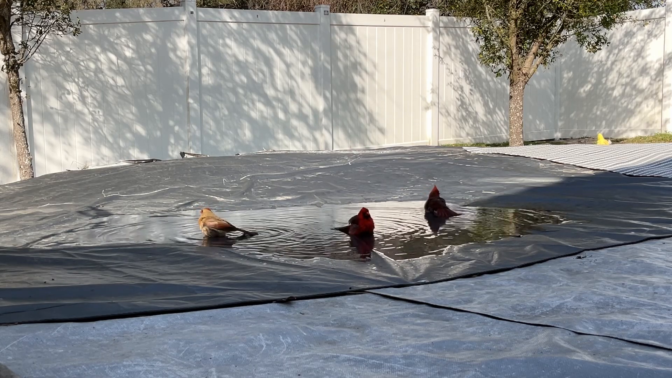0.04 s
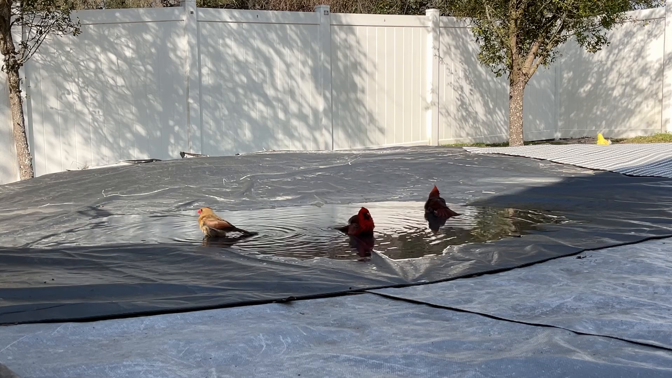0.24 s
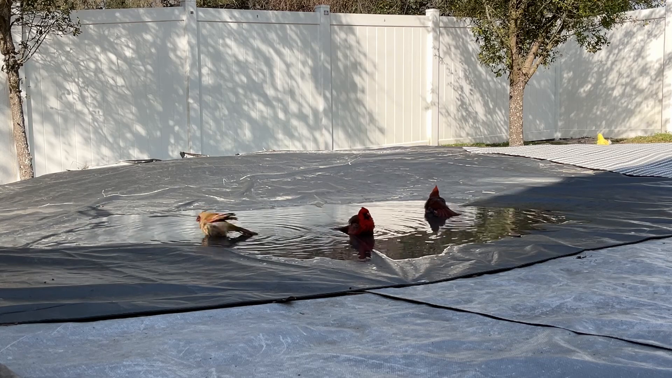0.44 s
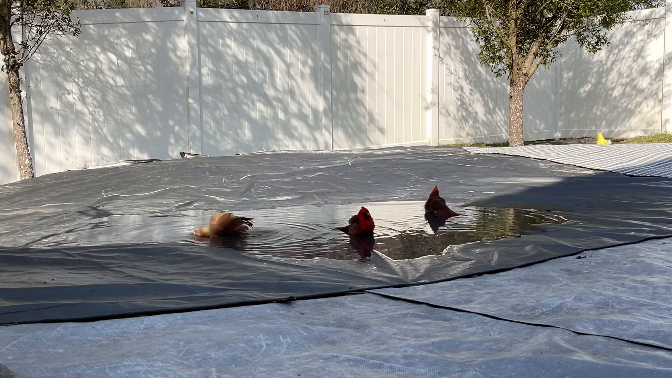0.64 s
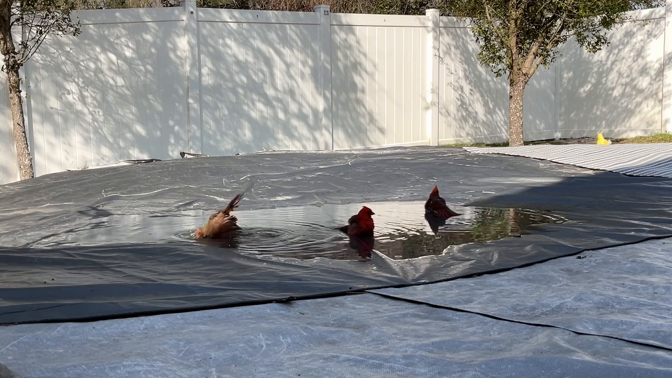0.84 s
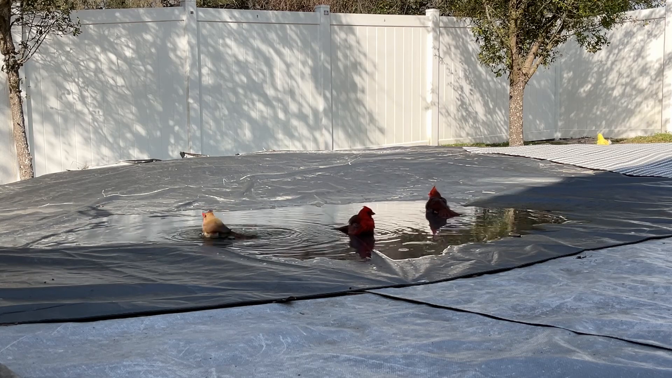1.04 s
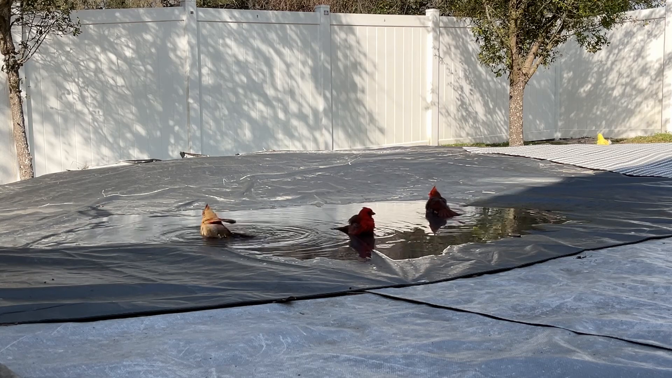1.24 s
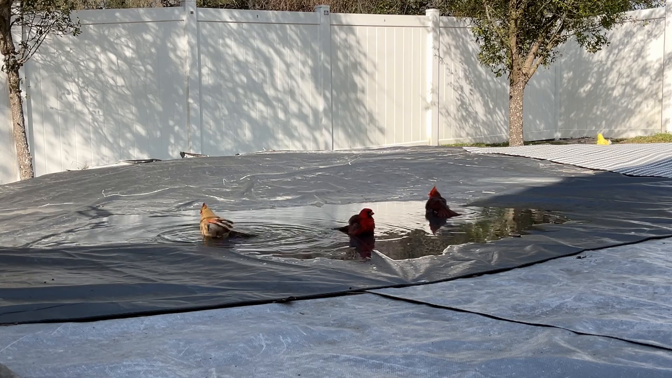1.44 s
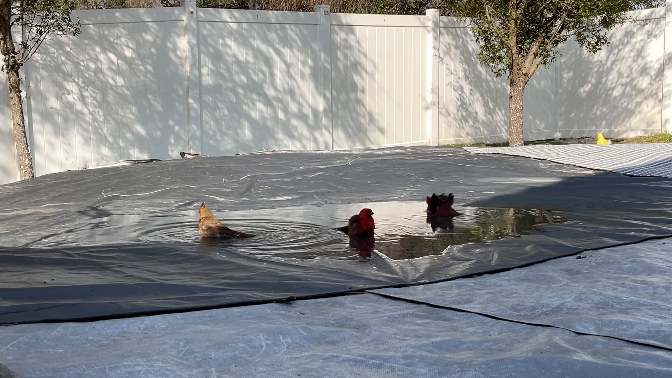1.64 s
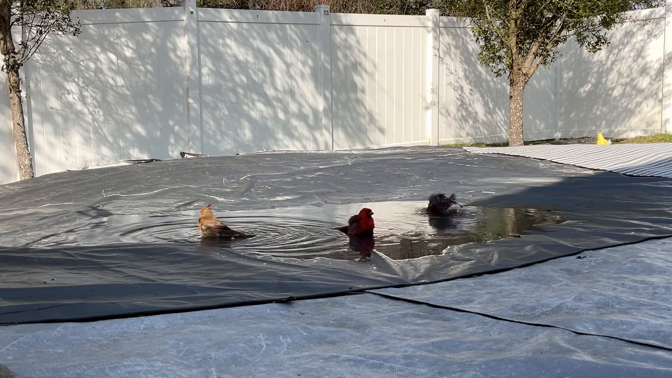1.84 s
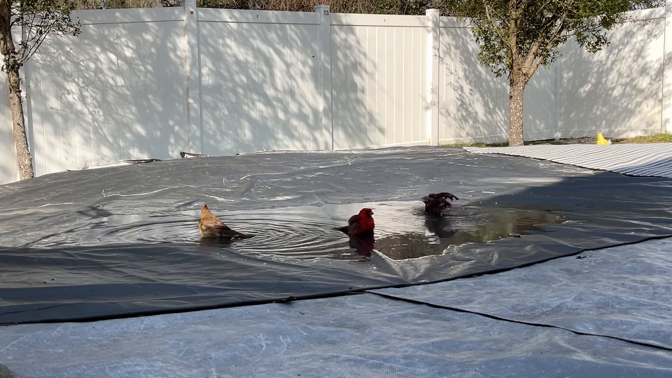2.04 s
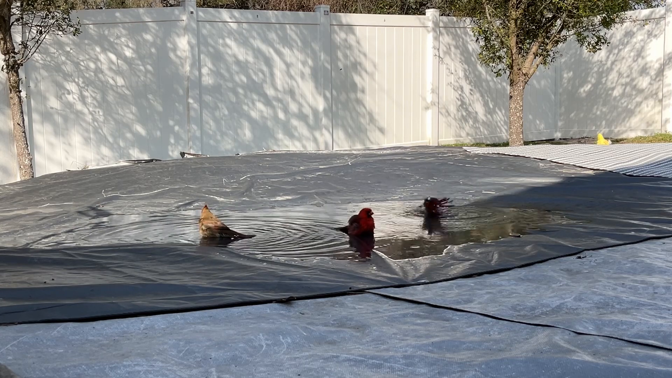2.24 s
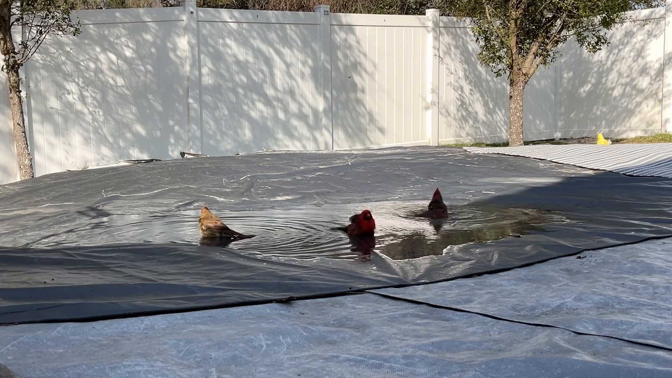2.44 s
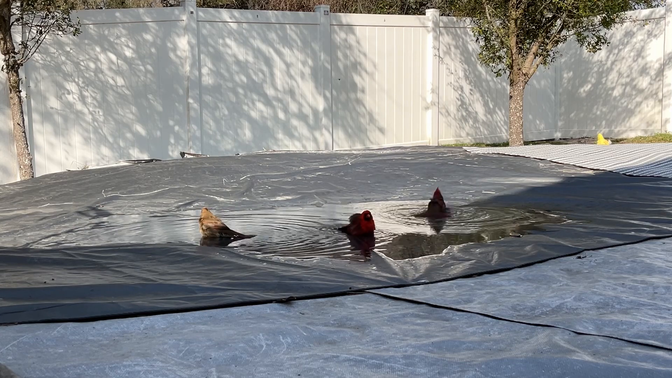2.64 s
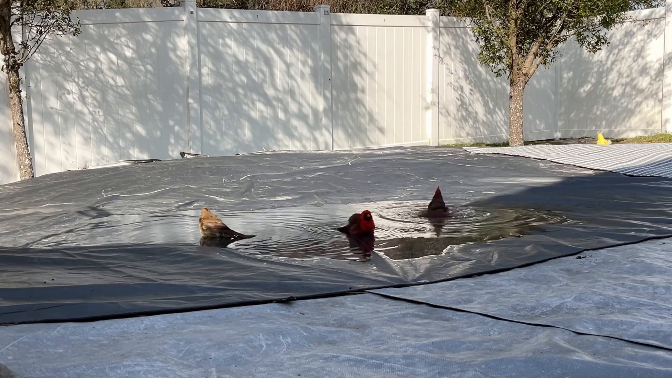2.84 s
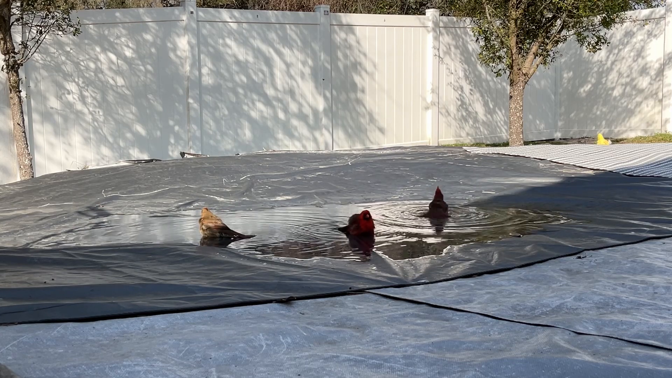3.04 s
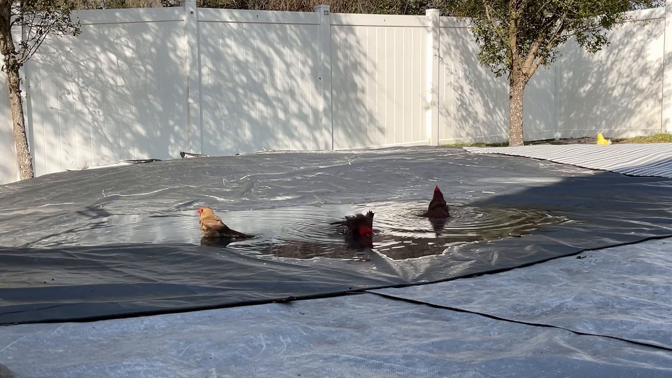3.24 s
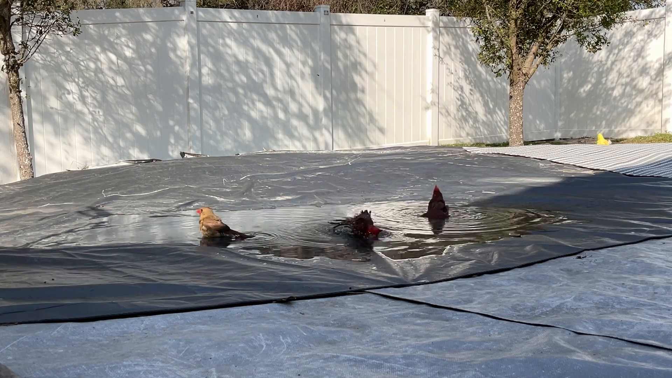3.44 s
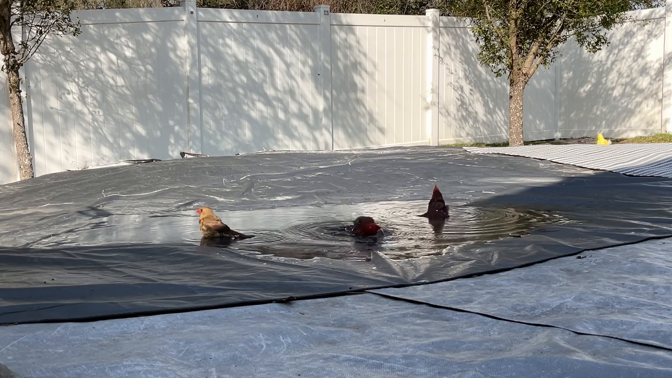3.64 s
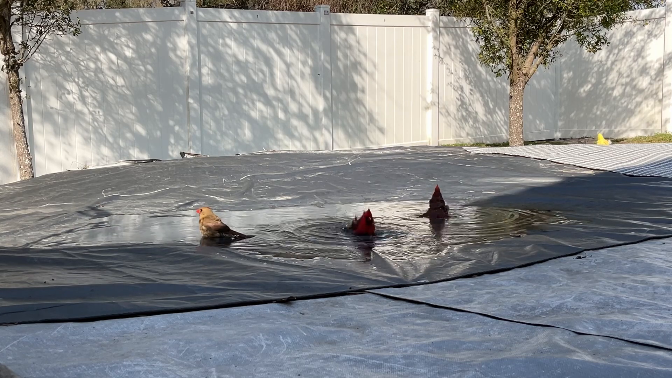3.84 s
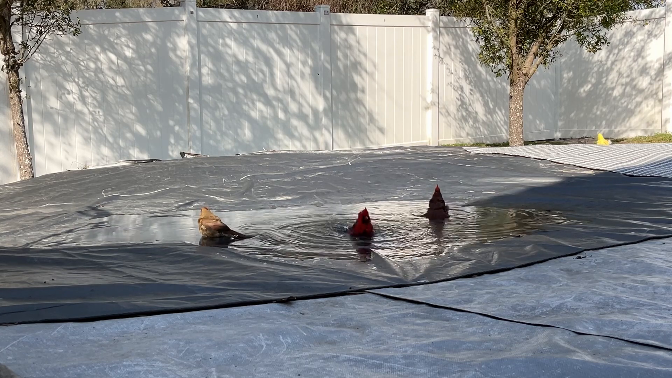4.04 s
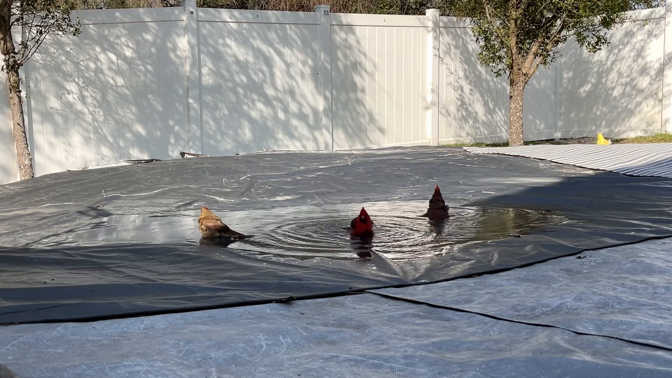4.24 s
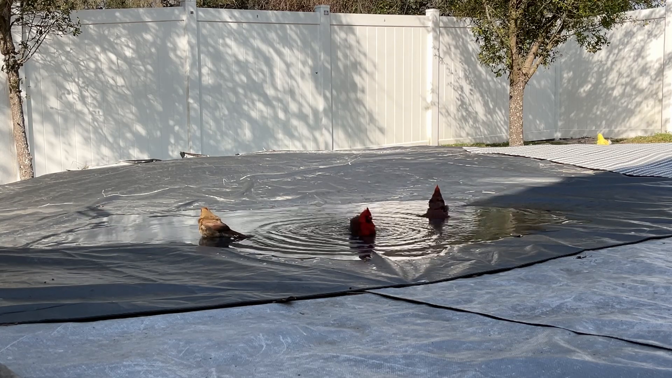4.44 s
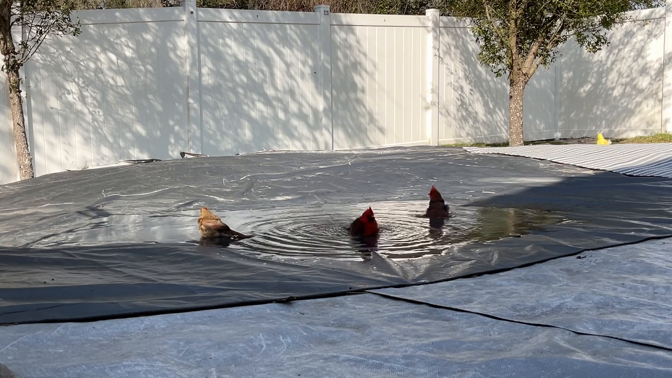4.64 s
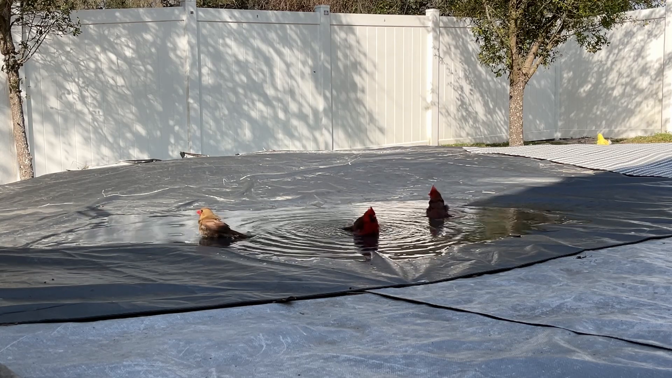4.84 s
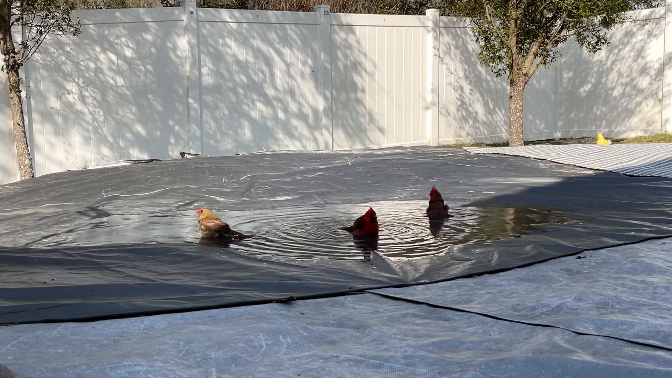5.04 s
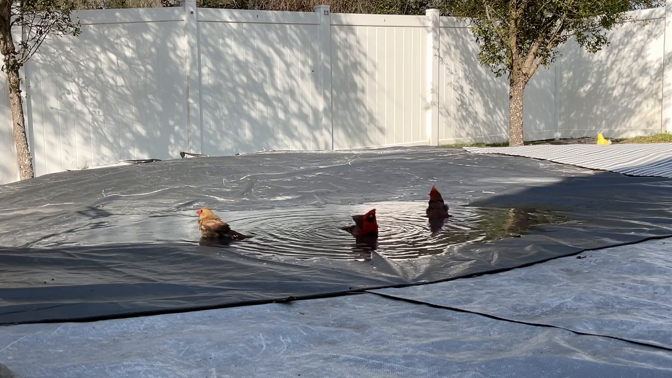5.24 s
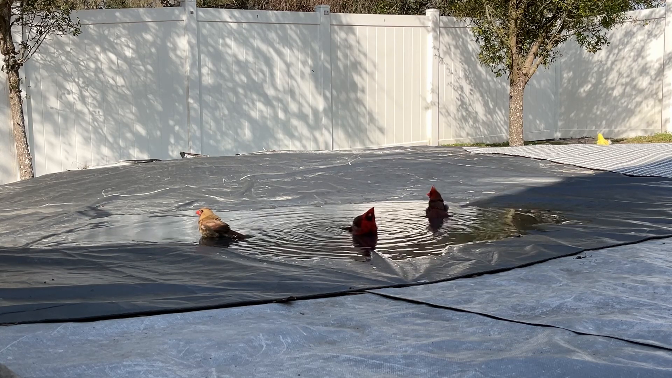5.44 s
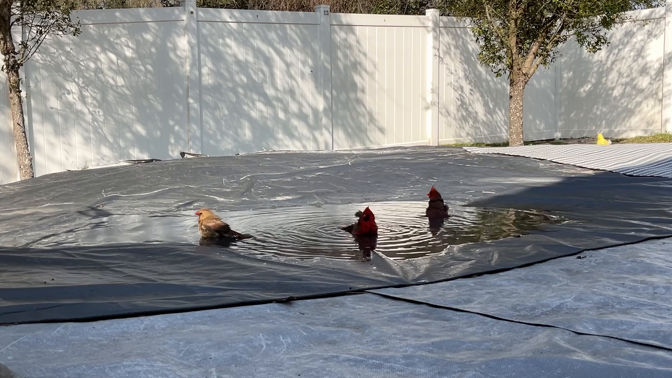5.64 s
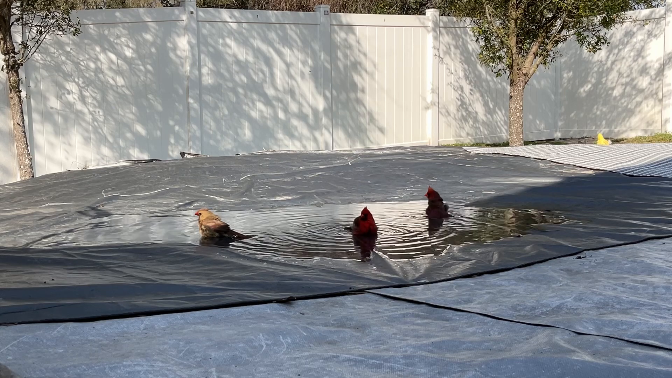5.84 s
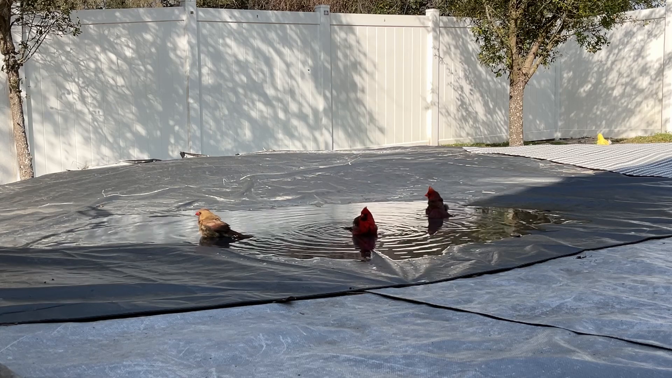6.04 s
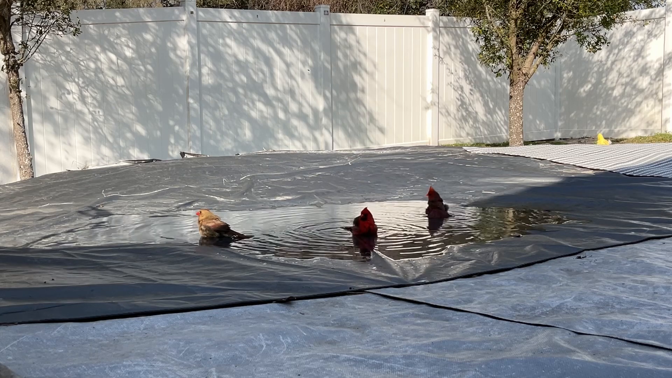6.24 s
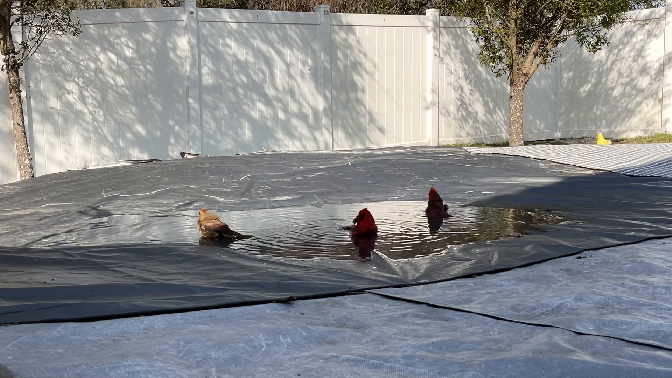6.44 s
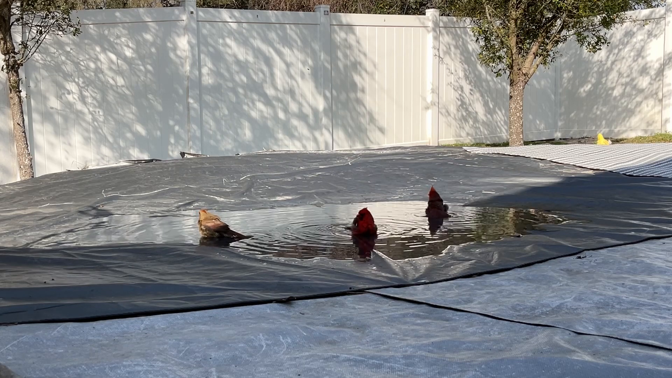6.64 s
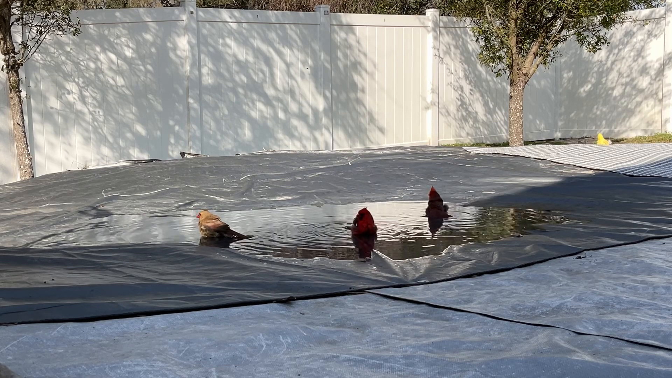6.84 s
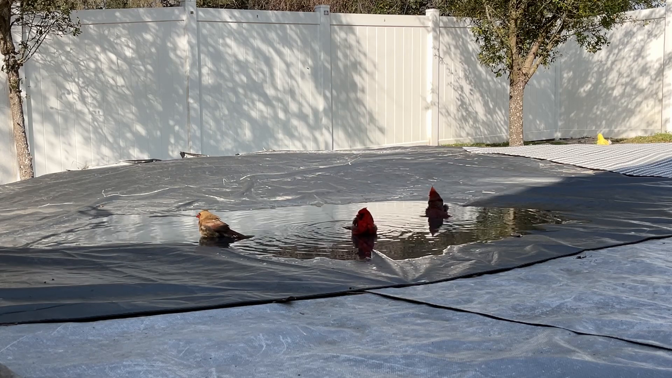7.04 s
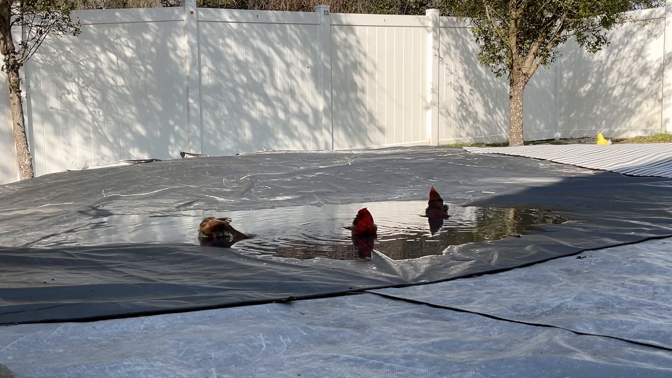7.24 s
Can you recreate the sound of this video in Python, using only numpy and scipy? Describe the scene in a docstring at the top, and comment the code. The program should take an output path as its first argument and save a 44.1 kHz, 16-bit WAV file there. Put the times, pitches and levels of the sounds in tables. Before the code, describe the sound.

Songbirds bathe in a shallow puddle on a plastic cover in a garden. Quick bouts of wing beats slap and splash, with small plops, bubbles and pattering drops, until just before five seconds. Faint whistles and thin chirps echo around; later distant crows, buzzy tweets and rising sweeps stand out. Low traffic rumble runs throughout, one engine fading away and another pulling up. Stereo microphone fairly close to the bath.

```python
"""Songbirds bathe in a puddle on a pool cover: bouts of wing beats slap the water and throw up spray.
Splashes are coloured trains of tiny drop impacts; trapped bubbles and air pockets ring as sines.
Other birds whistle and chirp in the echoing gardens around, crows call far off: gliding, buzzing tones.
Distant traffic rumbles as shaped noise; one engine cruises away, another pulls up through its gear."""
import sys
import numpy as np
from scipy import signal
from scipy.fft import rfft, irfft, next_fast_len
from scipy.io import wavfile
from scipy.ndimage import uniform_filter1d, map_coordinates

SR = 44100
rng = np.random.default_rng(int(sys.argv[2]) if len(sys.argv) > 2 else 0)


def output_pcm(signal):
    """Save a mono or channel-first signal as 16-bit PCM at the path in sys.argv[1].

    Samples are clipped to [-1, 1] before scaling.
    """
    pcm = np.clip(np.atleast_2d(signal).T, -1, 1) * 32767
    wavfile.write(sys.argv[1], SR, np.round(pcm).astype(np.int16))


N = 322371  # samples


def amp(db):
    """Decibels to gain."""
    return 10 ** (np.asarray(db) / 20)


def unit(x):
    """x at rms 1."""
    return x / np.sqrt(np.mean(x ** 2) + 1e-20)


def along(points, hz):
    """(hz, value) points read on a log frequency axis."""
    f, v = np.transpose(points)
    return np.interp(np.log(hz + 1), np.log(f), v)


def curves(rows):
    """One value per sample for each column after the time."""
    s, *cols = np.transpose(rows)
    return [np.interp(np.arange(N) / SR, s, c) for c in cols]


def wobble(rate):
    """A smooth random curve, rate knots a second."""
    knots = rng.standard_normal(int(N * rate / SR) + 4)
    return map_coordinates(knots, [np.arange(N) * rate / SR])


def filtered(x, response):
    """x times a response of frequency."""
    m = next_fast_len(N + SR // 2)
    return irfft(rfft(x, m) * response(np.fft.rfftfreq(m, 1 / SR)), m)[..., :N]


def coloured(x, spectrum):
    """x through a causal, minimum-phase filter of unit energy with this spectrum."""
    size = 4096
    cepstrum = irfft(np.log(amp(along(spectrum, np.fft.rfftfreq(size, 1 / SR)))))
    # keeping only positive times of the cepstrum puts the energy up front
    folded = 2 * cepstrum[:size // 2] * (np.arange(size // 2) > 0)
    kernel = irfft(np.exp(rfft(folded, size)))
    return signal.fftconvolve(x, kernel[None] / np.linalg.norm(kernel), axes=1)[:, :N]


# how alike left and right sound: hz, likeness (1 = identical)
LIKENESS = [(120, 1), (220, 0.85), (450, 0.77), (900, 0.71), (1300, 0.45), (1900, 0.17), (2500, 0.85),
            (3200, 1), (15000, 0.77)]


def stereo(pair):
    """Blends two unrelated signals into left and right, as alike as the microphone ports hear them."""
    def mid_and_side(hz):
        turn = np.arccos(np.clip(along(LIKENESS, hz), -1, 1)) / 2
        return np.array([np.cos(turn), np.sin(turn)])
    mid, side = filtered(pair, mid_and_side)
    return np.array([mid + side, mid - side])


def noise(spectrum):
    """Stereo noise of rms 1."""
    return unit(stereo(coloured(rng.standard_normal((2, N)), spectrum)))


def add(track, s, x):
    """Mix x into the track from time s."""
    part = track[max(round(s * SR), 0):][:len(x)]
    part += x[:len(part)]


def swell(t, rise, fall):
    """A quick rise and an exponential fall, top 1."""
    shape = (1 - np.exp(-t / rise)) ** 2 * np.exp(-t / fall)
    return shape / shape.max()


def sing(pitch):
    """A sine that follows a pitch curve in Hz."""
    return np.sin(2 * np.pi * np.cumsum(pitch) / SR)


# echo of the gardens: hz, t60_s
GARDEN_DECAY = [(300, 0.54), (2500, 0.75), (5000, 0.45), (9000, 0.46), (16000, 0.099)]


def garden(x):
    """Diffuse stereo echo of fences, houses and trees: noise that decays at its own rate in each band."""
    hz, t, z = signal.stft(rng.standard_normal((2, SR)), SR, nperseg=256)
    decay = amp(-60 * t / along(GARDEN_DECAY, hz)[:, None])
    tail = signal.istft(z * decay, SR, nperseg=256)[1]
    return stereo(signal.fftconvolve(x[None], tail / np.linalg.norm(tail[0]), axes=1)[:, :N])


# colour of the neighbourhood wash: hz, relative_level_db
AIR_COLOUR = [(100, -22), (220, 2.5), (350, -1.5), (650, -3), (900, -6.5), (1450, -16), (2200, -21),
              (3000, -28), (4500, -35.5), (8000, -38.5), (14000, -41), (16000, -58.5)]


def air():
    """The even wash of the neighbourhood as noise, with a faint machine hum as a sine."""
    hum = amp(-74.0 + 1.4 * wobble(2.4)) * np.sin(2 * np.pi * 240 * np.arange(N) / SR)
    return amp(-63.0 + 0.5 * wobble(3.39)) * noise(AIR_COLOUR) + hum


# exhaust orders: multiple_of_firing_rate, level_db against the engine
EXHAUST_ORDERS = [(1, -2), (1.5, -9.5), (2, -15.5)]
ENGINE_ONSET_S = 0.11  # fade in before its first table row, and out after its last


def engine(drive):
    """The low exhaust orders of one engine as sines, slightly unsteady."""
    hz, db = curves(drive)
    t = np.arange(N) / SR
    heard = np.clip(1 + np.minimum(t - drive[0][0], drive[-1][0] - t) / ENGINE_ONSET_S, 0, 1)
    phase = 2 * np.pi * np.cumsum(hz * (1 + 0.0168 * wobble(9))) / SR
    orders = np.zeros(N)
    for k, order_db in EXHAUST_ORDERS:
        orders += amp(db + order_db + 0.35 * wobble(15.0)) * np.sqrt(2) * np.sin(k * phase)
    return heard * orders


# traffic level: time_s, level_db
TRAFFIC_LEVEL = [(0, -47), (4.1, -48.5), (6, -46), (7.31, -47)]
# traffic colour: hz, relative_level_db
RUMBLE_COLOUR = [(18, -64.5), (27, -33.5), (39, -8.5), (55, -6.5), (78, 2), (105, -3.5), (160, -11.5),
                 (205, -23.5), (300, -39), (600, -84)]
# one engine cruises away: time_s, firing_rate_hz, level_db
CRUISING_ENGINE = [(-.05, 80.6, -47.5), (1, 75.16, -50), (2.7, 73.2, -59), (4.3, 71.56, -63.5)]
# another pulls up through its gear: time_s, firing_rate_hz, level_db
PULLING_ENGINE = [(4.1, 42, -71), (5, 56.13, -41.5), (5.35, 59.63, -52), (5.7, 67.9, -38),
                  (6.2, 72.8, -44.5), (6.95, 78.9, -45), (7.35, 81.2, -47)]


def road():
    """Traffic rumble as noise that swells a little, and two single engines."""
    rumble = amp(curves(TRAFFIC_LEVEL)[0] + 0.78 * wobble(3.586)) * noise(RUMBLE_COLOUR)
    return engine(CRUISING_ENGINE) + engine(PULLING_ENGINE) + rumble


def notes(table, flutter_rate):
    """Pure tones gliding through three pitches; a fast flutter of the syrinx makes them buzz."""
    out, flutter = np.zeros(N), wobble(flutter_rate)
    for s, length, start_hz, middle_hz, end_hz, db, buzz in table:
        u = np.linspace(0, 1, round(length * SR))
        glide = np.polyval(np.polyfit([0, .5, 1], [start_hz, middle_hz, end_hz], 2), u)
        pitch = glide * (1 + buzz * np.roll(flutter, -round(s * SR))[:len(u)])
        add(out, s, amp(db) * np.sqrt(np.abs(np.sin(np.pi * u))) * sing(pitch))
    return out


# far crows: start_s, length_s, pitch_hz, level_db before the mix
CROW_CALLS = [(4.56, 0.09, 1429, -70.5), (4.77, 0.25, 1414, -77), (5.399, 0.22, 1428, -76.5),
              (6.037, 0.16, 1539, -73.5), (6.244, 0.24, 1473, -75.5), (6.699, 0.1, 1444, -72),
              (7.019, 0.14, 1424, -71.5), (7.194, 0.15, 1383, -70)]
# partials of a caw: share_of_pitch, level_db against the caw
CROW_PARTIALS = [(.85, -8), (1, .5), (1.14, -9)]
# partials of a jay's harsh cry at the start: pitch_hz, level_db before the mix
JAY_PARTIALS = [(950, -60), (2370, -62.5), (3220, -71.5)]
CAW_DROP, CAW_BUZZ = 0.064, 0.08  # sinking at the end, flutter (shares of the pitch)
JAY_S, JAY_BUZZ = 0.012, 0.092  # length, flutter


def corvids():
    """Harsh far cries: stacks of buzzing partials that sink at the end."""
    def partial(s, length, hz, db, buzz):
        return s, length, hz, hz, hz * (1 - CAW_DROP), db, buzz
    cries = [partial(0, JAY_S, hz, db, JAY_BUZZ) for hz, db in JAY_PARTIALS]
    for s, length, hz, db in CROW_CALLS:
        for share, part_db in CROW_PARTIALS:
            cries.append(partial(s, length, share * hz, db + part_db, CAW_BUZZ))
    return notes(cries, flutter_rate=460)


# the far flock: lowest middle pitch, range, level of its faintest notes before the mix
FLOCK_HZ, FLOCK_SPAN_HZ, FLOCK_DB = 3500, 2500, -88.5


def twitter(count=60):
    """Faint short notes of a far flock at random times, most of them low, hooked up or down."""
    rows = []
    for when, length, pitch, bend, loud in rng.random((count, 5)):
        hz = FLOCK_HZ + FLOCK_SPAN_HZ * pitch ** 2
        hook = .2 * (bend - .5)
        start_hz, end_hz = hz * (1 - hook), hz * (1 + hook / 2)
        rows.append((N / SR * when, 0.012 + .035 * length, start_hz, hz, end_hz, FLOCK_DB + 6 * loud, .035))
    return notes(rows, flutter_rate=1000)


# sharp contact notes: start_s, length_s, start_hz, middle_hz, end_hz, level_db, buzz (share of the pitch)
CONTACT_NOTES = [(.0565, .004, 8000, 5900, 4500, -53, .02), (5.681, .004, 4900, 4200, 3600, -69, .05),
                 (5.701, .004, 4900, 4200, 3600, -68, .05), (5.709, .004, 5080, 4300, 3650, -63, .05)]


def contact_notes():
    """Birds at the puddle give very short, steeply falling tones."""
    return notes(CONTACT_NOTES, flutter_rate=1300)


# thin calls: start_s, length_s, start_hz, end_hz, level_db before the mix, buzz (share of the pitch)
THIN_CALLS = [(0.241, 0.022, 4160, 3800, -78, 0.11), (0.43, 0.012, 5600, 5910, -71, 0.045),
              (1.404, 0.064, 6850, 7670, -73, .01), (1.555, 0.2, 6270, 5600, -81.5, 0.048),
              (1.708, 0.1, 7950, 8200, -66.5, 0.031), (2.247, 0.37, 6240, 4990, -76, 0.19),
              (2.823, 0.17, 6640, 6020, -81.5, 0.047), (3.273, 0.058, 7860, 8060, -63, 0.035),
              (4.778, 0.036, 7820, 7050, -67.5, 0.051), (4.947, 0.24, 7330, 5760, -73.5, 0.065),
              (5.26, 0.046, 5770, 5120, -73, 0.16), (5.996, 0.05, 7130, 8000, -74.5, 0.014),
              (6.738, 0.059, 7614, 7380, -78.5, 0.047), (7.056, 0.048, 6130, 7150, -72.5, 0.094),
              (7.07, 0.095, 7930, 8200, -70, 0.038)]
GLIDE = .7  # share of its glide that a thin call has covered half-way through
# one long call, one voice sinking slowly, the other plunging:
# start_s, length_s, start_hz, middle_hz, end_hz, level_db before the mix, buzz (share of the pitch)
SLURRED_CALL = [(5.512, .2, 6750, 6350, 5950, -69, .015), (5.6, .085, 6300, 5500, 4100, -70.5, .075)]
# one bird's short buzzy tweets: start_s, pitch_hz, level_db before the mix
BUZZY_TWEETS = [(5.86, 5300, -87), (6.125, 5000, -78), (6.275, 5650, -82), (6.48, 5400, -80),
                (6.577, 4720, -77.5), (6.595, 6650, -81.5), (6.79, 4630, -91), (7.006, 4970, -79),
                (7.228, 5650, -79.5)]
TWEET_S, TWEET_BEND, TWEET_BUZZ = 0.043, (0.68, 1.03, 1.04), .11  # length; three pitches as shares; buzz
# a plain falling two-note song: start_s, length_s, pitch_hz, level_db before the mix
TWO_NOTE_SONG = [(5.245, 0.29, 4333, -76), (5.815, .24, 3806, -77.5)]
SONG_SAG, SONG_BUZZ = .008, 0.011  # each note starts this share above its pitch and ends as far below; buzz


def small_birds():
    """Thin gliding calls, a plunging slur, a few tweets and a two-note song, all fluttering tones."""
    rows = list(SLURRED_CALL)
    for s, length, start_hz, end_hz, db, buzz in THIN_CALLS:
        middle_hz = start_hz + GLIDE * (end_hz - start_hz)
        rows.append((s, length, start_hz, middle_hz, end_hz, db, buzz))
    for s, hz, db in BUZZY_TWEETS:
        rows.append((s, TWEET_S, *(hz * np.array(TWEET_BEND)), db, TWEET_BUZZ))
    for s, length, hz, db in TWO_NOTE_SONG:
        rows.append((s, length, hz * (1 + SONG_SAG), hz, hz * (1 - SONG_SAG), db, SONG_BUZZ))
    return notes(rows, flutter_rate=1100)


# stray drops patter while the birds bathe: from, to, drops a second
STRAY_FROM_S, STRAY_TO_S, STRAY_PER_S = 0.3, 3.6, 91
STRAY_DB, STRAY_SPREAD_DB, STRAY_HZ = -73.5, 4.8, 5930  # base level, spread, typical pitch


def strays():
    """Single drops fall from the feathers; each ticks at its own pitch for a cycle or two."""
    out, t = np.zeros(N), np.arange(SR // 200) / SR
    span = STRAY_TO_S - STRAY_FROM_S
    for when, pitch, size in rng.random((500, 3))[:round(STRAY_PER_S * span)]:
        hz = STRAY_HZ * 2 ** (1.6 * (pitch - .5))
        db = STRAY_DB - STRAY_SPREAD_DB * np.log(size + 0.026)
        tick = np.exp(-t * hz / 2.8) * np.sin(2 * np.pi * hz * t)
        add(out, STRAY_FROM_S + when * span, amp(db) * tick)
    return out


# bouts of wing beats, levels at the height of the bout:
# first_beat_s, last_beat_s, splash_db, fizz_db, slap_db, spray_db
WING_BOUTS = [(0.492, 0.582, -67.5, -75, -84, -96), (0.625, 0.969, -59.5, -61, -52.5, -69),
              (1.07, 1.118, -68, -79, -66, -71), (1.154, 1.486, -61, -63.5, -57, -90),
              (1.736, 2.178, -55.5, -57.5, -55, -72), (2.272, 2.414, -65.5, -71.5, -72, -75),
              (2.602, 2.8, -60, -60, -58, -93), (3.018, 3.132, -66, -69, -62, -81),
              (3.19, 3.453, -59.5, -61, -61.5, -66.5), (3.496, 3.651, -62, -58, -69, -62.5),
              (3.742, 4.071, -59.5, -62, -57.5, -80), (4.385, 4.762, -63, -68.5, -63.5, -73.5)]
WING_HZ, SLOWING = 20.5, 0.055  # typical beat rate; the beats spread out as the bird tires
# softer at both ends of a bout; under 1 the effort crests early; luck from beat to beat
EASE_DB, CREST, UNEVEN_DB = 3.5, 0.58, 1.5
SPRAY_GROWS = 2.23  # spray grows faster than effort


def wing_beats():
    """Every beat as (s, splash dB, fizz dB, slap dB, spray dB); effort swells and ebbs within a bout."""
    beats = []
    for first, last, splash_db, fizz_db, slap_db, spray_db in WING_BOUTS:
        u = np.linspace(0, 1, round((last - first) * WING_HZ) + 1)
        times = first + (last - first) * (u - SLOWING * u * (1 - u))
        efforts = -EASE_DB * (2 * u ** CREST - 1) ** 2
        for s, effort, luck in zip(times, efforts, UNEVEN_DB * rng.standard_normal(len(u))):
            push = effort + luck
            beats.append((s, splash_db + push, fizz_db + push, slap_db + push, spray_db + SPRAY_GROWS * effort))
    return beats


STROKE_LEAD_S = .05  # room for the rise of a stroke
STROKE_EARLY_S = STROKE_LEAD_S - 0.0018  # started this early, a stroke peaks 1.8 ms after its listed time


def stroke(rise, fall):
    """An exponential rise to 1 and an exponential fall, in seconds."""
    t = np.arange(SR // 7) / SR - STROKE_LEAD_S
    return np.exp(np.where(t < 0, t / rise, -t / fall))


def droplets(rate, spread_db):
    """Two trains of tiny impacts of very unequal size, rms 1."""
    hits = rng.random((2, N)) < rate / SR
    signs = rng.choice([-1, 1], (2, N))
    sizes = amp(spread_db * np.minimum(rng.exponential(size=(2, N)), np.pi))
    return unit(hits * signs * sizes)


def speckled(x, depth_db):
    """Every small clump of drops rings with its own random colour."""
    z = signal.stft(x, nperseg=256)[2]
    field = uniform_filter1d(rng.standard_normal(z.shape[1:]), size=5, axis=0)
    field = uniform_filter1d(field, size=3, axis=1)
    gain = unit(amp(depth_db * unit(field)))
    return signal.istft(z * gain, nperseg=256)[1][:, :N]


def bubble(hz, cycles):
    """A trapped bubble rings briefly and rises in pitch."""
    t = np.arange(SR // 12) / SR
    return swell(t, rise=0.0024, fall=cycles / hz) * np.sin(2 * np.pi * hz * (t + 3 * t * t))


# a wing tip catches the surface flat: time_s, peak_db before colouring, brightness_db
WING_CRACKS = [(0.5352, -62.5, 17), (.571, -58.5, 4.5), (0.623, -46, -2), (0.6714, -44, -3),
               (0.7064, -37.5, -11), (0.7191, -29.5, -8), (.789, -42, -2), (.8725, -50, -3),
               (.9238, -46, 2), (0.971, -50.5, -3), (1.204, -42.5, -17), (1.249, -40, 0.5),
               (1.294, -53.5, 2), (1.378, -46, -2), (1.4362, -36, -3.5), (1.4809, -43, -4),
               (1.554, -50.5, -13), (1.7671, -47, 6), (1.7852, -38.5, -1.5), (1.8295, -37, -3.5),
               (1.861, -42, -4), (1.88, -33, 0.5), (1.912, -45, 0), (1.9247, -41.5, -2), (1.9575, -45, -1),
               (1.971, -41.5, 7), (2.0122, -41.5, -5), (2.1256, -43, 3.5), (2.322, -62, 10.5),
               (2.525, -56.5, 6), (2.599, -48.5, -3), (2.693, -50.5, -4.5), (2.703, -40, -6),
               (2.7418, -48, 0), (2.7525, -44, 1), (2.8037, -43.5, 0.5), (3.138, -46, -1),
               (3.1875, -38.5, -2), (3.236, -45, -15), (3.2507, -38.5, -17), (3.285, -42, -4),
               (3.321, -60, 7), (3.39, -39.5, -3.5), (3.435, -37, -5.5), (3.4777, -33, 0.5),
               (3.7787, -48, -5), (3.8363, -38, 2), (3.881, -36, -1.5), (3.926, -35, -7.5),
               (3.961, -39.5, -2), (3.9721, -39, -4.5), (4.476, -41.5, -9), (4.5721, -38.5, -10),
               (4.6135, -42.5, -5.5), (4.6508, -41.5, -8), (4.914, -60.5, 2.5)]


def cracks():
    """Sub-millisecond noise snaps of flat wing tips: a plain track and one weighted by brightness."""
    plain, bright = np.zeros((2, N))
    for s, peak_db, bright_db in WING_CRACKS:
        shape = stroke(rise=0.00015, fall=0.00064)
        snap = rng.standard_normal(len(shape)) * shape
        snap *= amp(peak_db) / np.abs(snap).max()
        add(plain, s - STROKE_EARLY_S, snap)
        add(bright, s - STROKE_EARLY_S, amp(bright_db) * snap)
    return plain, bright


# colours of the slap, the splashing water and its fine mist: hz, relative_level_db
SLAP_COLOUR = [(120, -53.5), (280, 11), (400, 4), (650, 0), (1000, 0.5), (1700, -13), (2500, -6),
               (4000, -31), (9000, -45)]
WATER_COLOUR = [(200, -31), (700, -10), (1500, 3.5), (2600, -5.5), (3800, 2.5), (6300, 1), (8000, -5.5),
                (10000, -8.5), (16000, -39)]
MIST_COLOUR = [(4000, -37), (7000, -4), (8500, -0.5), (10200, 2.5), (12500, -8.5), (16000, -11.5)]
SPRAY_RISE_S, SPRAY_FALL_S = 0.011, 0.041  # spray goes up, and comes down over this time
SPRAY_BODY_DB = -10  # dull part of the patter
TRICKLE_DB, TRICKLE_S = -49, 0.12  # water runs off the feathers: level against the splash, decay
SHEET_DB, SHEET_PER_S = 3, 140  # a splash tears into uneven sheets of water: depth, rate


def bathing():
    """Each wing beat sweeps into the water, slaps it, traps bubbles and throws drops that patter back."""
    slap, splash, fizz, gurgle, spray_power = np.zeros((5, N))
    shove, sweep = stroke(rise=0.0026, fall=0.0097), stroke(rise=0.0087, fall=0.009)
    t = np.arange(SR // 2) / SR
    shower, trickle = swell(t, SPRAY_RISE_S, SPRAY_FALL_S), swell(t, SPRAY_RISE_S, TRICKLE_S)
    for s, splash_db, fizz_db, slap_db, spray_db in wing_beats():
        add(splash, s - STROKE_EARLY_S, amp(splash_db) * sweep)
        add(fizz, s - STROKE_EARLY_S, amp(fizz_db) * sweep)
        add(slap, s - STROKE_EARLY_S, amp(slap_db) * shove)
        add(spray_power, s, (amp(spray_db) * shower) ** 2 + (amp(splash_db + TRICKLE_DB) * trickle) ** 2)
        for late, pitch in rng.standard_normal((3, 2)):
            ring = bubble(620 * np.exp(.55 * pitch), cycles=3.8)
            add(gurgle, s + 0.00505 * abs(late), amp(slap_db - 11.0) * ring)
    crack, bright_crack = cracks()
    spray = np.sqrt(spray_power) * amp(2.6 * wobble(70))  # the patter comes in clumps
    sheets = unit(amp(SHEET_DB * wobble(SHEET_PER_S)))
    dense = sheets * droplets(rate=6000, spread_db=4.8)
    sparse = droplets(rate=750, spread_db=6.3)
    ahead = np.array([[1], [0]])  # cracks reach both ports alike
    water = coloured(splash * dense + spray * sparse + ahead * crack, WATER_COLOUR)
    mist = coloured(fizz * dense + amp(-4.0) * spray * sparse + ahead * bright_crack, MIST_COLOUR)
    spatter = stereo(speckled(water + mist, depth_db=2.3))
    body = (slap + amp(SPRAY_BODY_DB) * spray) * noise(SLAP_COLOUR)
    return spatter + body + gurgle


# a wing scoops deep, and the air pocket behind it plops: time_s, final_pitch_hz, plop_db, smack_db
WING_SCOOPS = [(0.6233, 526, -59, -63), (0.6717, 403, -59, -56), (.72, 560, -60, -61.5),
               (0.7682, 327, -51, -49), (0.798, 298, -48.5, -64), (0.8191, 330, -54, -57),
               (0.8721, 477, -56, -51.5), (0.9248, 310, -48, -53), (.970, 392, -47.5, -50.5),
               (1.205, 480, -60, -58.5), (1.336, 245, -54, -61), (1.437, 420, -59, -54),
               (1.787, 450, -53.5, -55), (1.8315, 412, -44, -56), (1.881, 392, -51, -56),
               (1.9275, 350, -47, -56), (1.958, 290, -47.5, -64), (1.9728, 450, -49.5, -56),
               (2.058, 398, -47.5, -57), (2.128, 385, -54, -60), (2.694, 416, -62, -56),
               (2.743, 450, -62, -56), (2.753, 378, -52, -57), (2.8064, 346, -53.5, -68),
               (3.19, 403, -58, -57), (3.2355, 420, -67, -60), (3.286, 353, -55, -58),
               (3.837, 460, -60, -48.5), (3.881, 470, -62, -50)]
# colour of the wet smack: hz, relative_level_db
SMACK_COLOUR = [(200, -28.5), (500, -0.5), (900, 6), (1400, -1), (1800, -7), (2400, -15), (4000, -26)]
PLOP_DROP, PLOP_DROP_S = 1.42, 0.0018  # the pitch starts higher by this share and settles over this time
PLOP_RISE_S, PLOP_FALL_S = .0013, .0054  # the pocket's ring
SMACK_RISE_S, SMACK_FALL_S = 0.00081, 0.0021  # the smack's burst


def scoops():
    """A deep stroke smacks the water and opens an air pocket whose pitch drops as it widens."""
    smack, plop = np.zeros((2, N))
    t = np.arange(SR // 20) / SR
    for s, hz, plop_db, smack_db in WING_SCOOPS:
        pitch = hz * (1 + PLOP_DROP * np.exp(-t / PLOP_DROP_S))
        add(plop, s, amp(plop_db) * swell(t, PLOP_RISE_S, PLOP_FALL_S) * sing(pitch))
        add(smack, s, amp(smack_db) * swell(t, SMACK_RISE_S, SMACK_FALL_S))
    return plop + smack * noise(SMACK_COLOUR)


# when the whistle sounds: start_s, level_db before the mix
WHISTLE_CALLS = [(0.92, -74.5), (1.267, -72.5), (3.525, -73.5), (3.865, -72), (4.24, -73.5), (6.175, -73)]
# its shape: time_s from the start, pitch_hz, level_db against the call
WHISTLE_SHAPE = [(0, 2640, -2), (.014, 2640, 4), (.053, 2625, 3), (.068, 2450, -6), (.093, 2640, -1),
                 (.118, 2440, -6), (.146, 2660, 2), (.173, 2470, 0), (.19, 2305, -2), (.238, 2295, -3),
                 (.258, 2290, -18)]
WHISTLE_BUZZ, WHISTLE_DRIFT = .012, 0.00386  # flutter, and scatter from call to call (shares of the pitch)


def whistler():
    """One bird repeats its whistle: a pure start, two quavers, then a break to a held lower note."""
    out = np.zeros(N)
    marks, pitches, levels = np.transpose(WHISTLE_SHAPE)
    t = np.arange(round(marks[-1] * SR)) / SR
    hz = np.interp(t, marks, pitches)
    shape = amp(np.interp(t, marks, levels)) * signal.windows.tukey(len(t), .08)
    for s, db in WHISTLE_CALLS:
        drift = WHISTLE_DRIFT * rng.standard_normal()
        pitch = hz * (1 + drift + WHISTLE_BUZZ * wobble(221.0)[:len(t)])
        add(out, s, amp(db) * shape * sing(pitch))
    return out


# single drips that trap a bubble: time_s, pitch_hz at first, level_db
LONE_DRIPS = [(1.785, 1460, -57.5), (2.072, 1474, -59.5), (2.418, 4630, -56), (3.479, 1855, -56.5),
              (4.092, 676, -50.5), (4.296, 1780, -61), (4.611, 1310, -60)]


def drips():
    """Lone drops fall back into the puddle, each ringing a trapped bubble."""
    out = np.zeros(N)
    for s, hz, db in LONE_DRIPS:
        add(out, s, amp(db) * bubble(hz, cycles=6.6))
    return out


# partials of one short harsh far yap: pitch_hz, level_db before the mix
YAP_PARTIALS = [(1050, -69), (1330, -66), (1620, -71), (1930, -68.5)]
YAP_AT_S, YAP_S, YAP_BUZZ = 6.683, 0.023, 0.06  # time, length, buzz (share of the pitch)


def yap():
    """One short rough cry from a neighbouring garden: level partials with a flutter."""
    return notes([(YAP_AT_S, YAP_S, hz, hz, hz, db, YAP_BUZZ) for hz, db in YAP_PARTIALS], flutter_rate=600)


# clean upward sweeps: start_s, level_db before the mix
UPWARD_SWEEPS = [(6.695, -79), (6.868, -74), (6.995, -77.5), (7.058, -71), (7.192, -78), (7.25, -69.5)]
SWEEP_S, SWEEP_HZ = 0.053, (1870, 2460, 3836)  # length; start, middle and end pitch


def sweeper():
    """A nearer bird starts a run of clean upward sweeps, strong and weak ones mixed."""
    return notes([(s, SWEEP_S, *SWEEP_HZ, db, 0) for s, db in UPWARD_SWEEPS], flutter_rate=1)


# lean of the puddle's direction: hz, left_over_right_db
PUDDLE_LEAN = [(450, -4), (580, -1), (750, 7), (930, 8), (1150, -0.5)]


def scene():
    """The bath close by, birds around it, road and air; the farther a bird, the more of it is echo."""
    bath = bathing() + scoops() + drips() + strays() + contact_notes()
    whistle, chirps, crows = whistler(), small_birds(), corvids()
    sweeps, flock, cry = sweeper(), twitter(), yap()
    direct = amp(5) * whistle + amp(-2) * chirps + sweeps + flock + cry
    to_echo = amp(-10.5) * bath[0] + amp(10.5) * whistle + amp(-1.5) * chirps + amp(5.0) * crows
    to_echo += amp(-3) * sweeps + amp(3.5) * flock + amp(3.5) * cry
    side = np.array([[.5], [-.5]])
    near = filtered(bath, lambda hz: amp(side * along(PUDDLE_LEAN, hz)))
    return near + direct + garden(to_echo) + road() + air()


# phase between the two microphone ports: hz, left_lead_radians
PORT_LEAD = [(150, 0), (460, .3), (900, 3), (1150, 4.2), (1400, 6.6), (1650, 6.4), (2000, 4.3),
             (2300, 3.75), (2680, 3.7), (2880, 3.14), (3900, .5), (4600, .3), (5300, .8), (6000, .3),
             (7300, 1.1), (8600, 0)]
# level between the ports: hz, left_over_right_db
PORT_LEAN = [(80, 0), (150, -2.5), (215, 1), (330, 3.5), (560, 0.5), (900, 0), (1100, 2.5), (1350, -9.5),
             (1700, -0.5), (2300, 0.5)]
TOP_HZ = 15900  # band limit


def record(dry):
    """The ports hear each band slightly apart in phase and level; nothing is kept above the band limit."""
    side = np.array([[.5], [-.5]])
    soft_ends = signal.windows.tukey(N, .002)

    def ports(hz):
        phase = np.exp(1j * side * along(PORT_LEAD, hz))
        return phase * amp(side * along(PORT_LEAN, hz)) * (hz < TOP_HZ)
    return filtered(dry * soft_ends, ports)


dry = scene()
out = record(dry)
output_pcm(out)
```